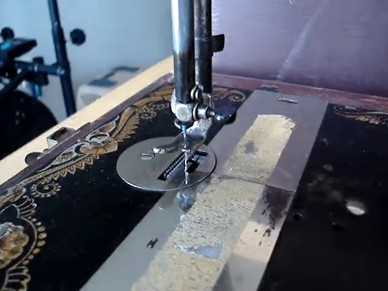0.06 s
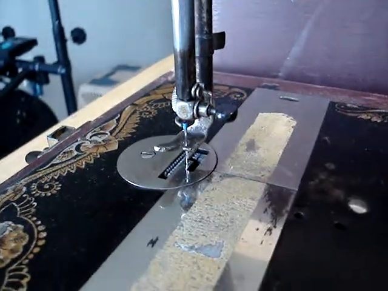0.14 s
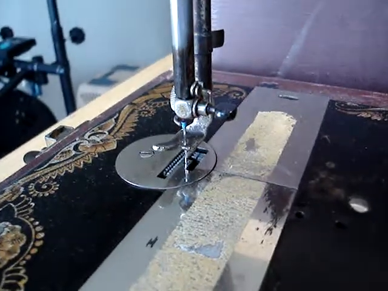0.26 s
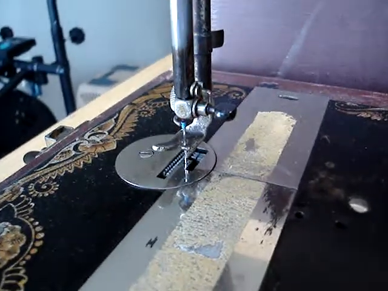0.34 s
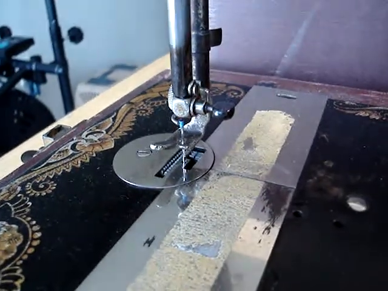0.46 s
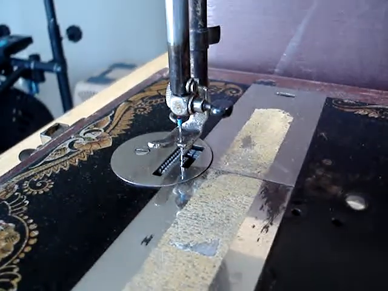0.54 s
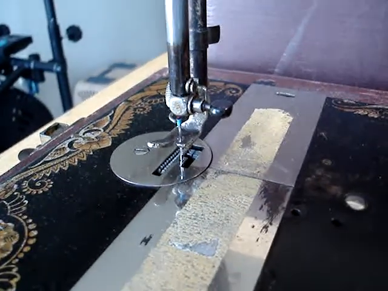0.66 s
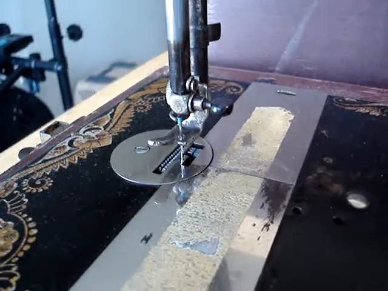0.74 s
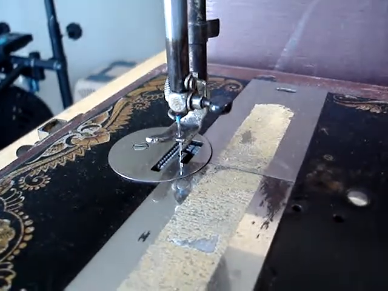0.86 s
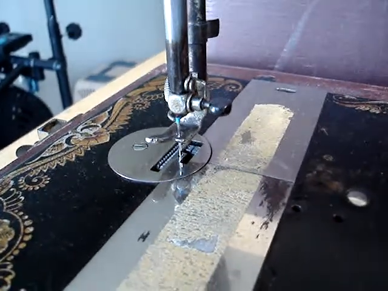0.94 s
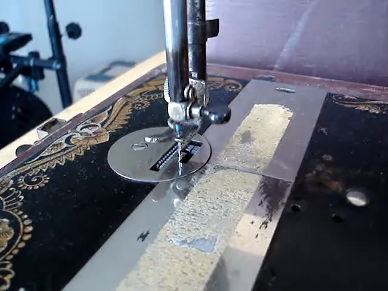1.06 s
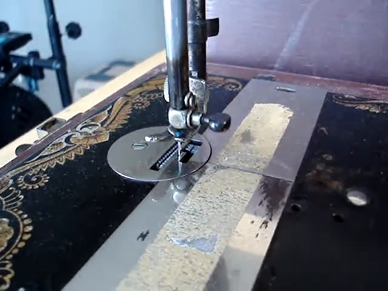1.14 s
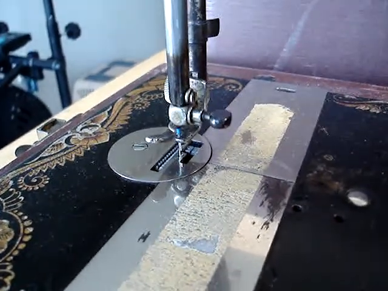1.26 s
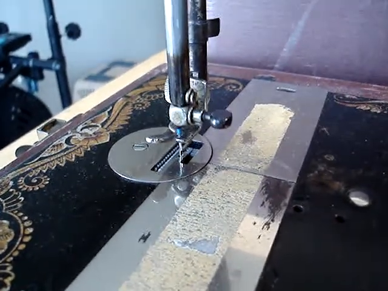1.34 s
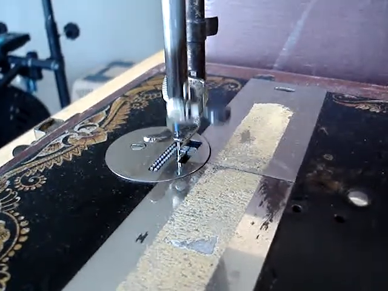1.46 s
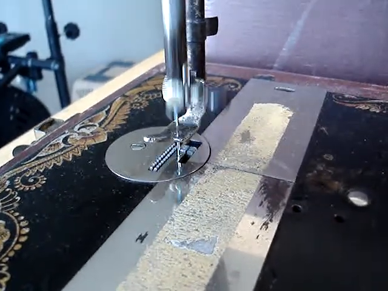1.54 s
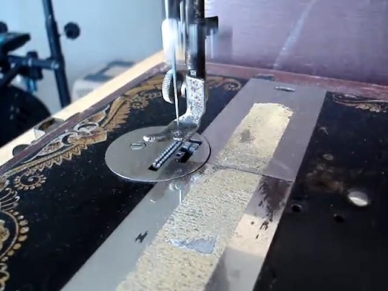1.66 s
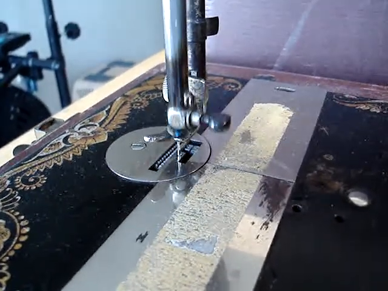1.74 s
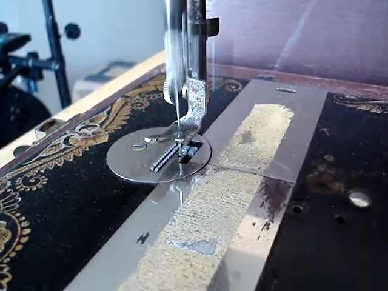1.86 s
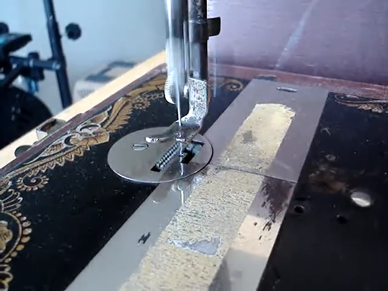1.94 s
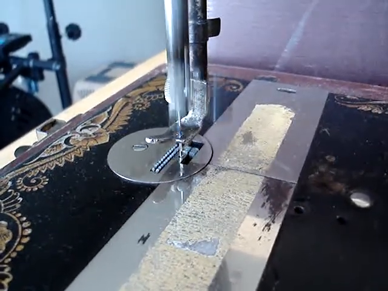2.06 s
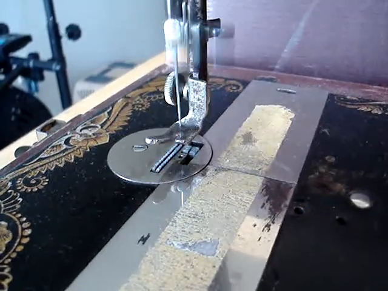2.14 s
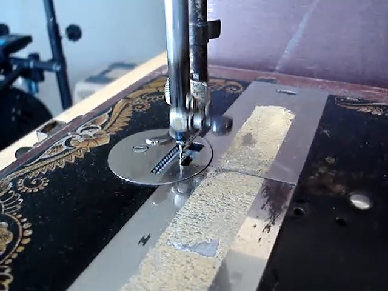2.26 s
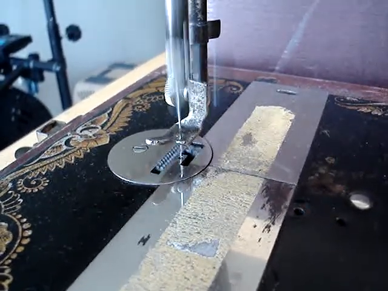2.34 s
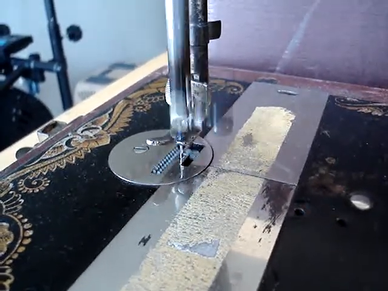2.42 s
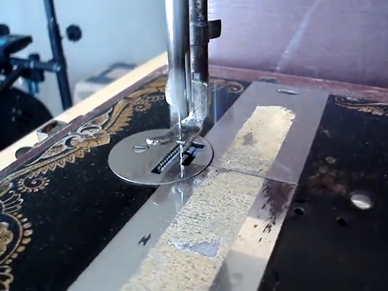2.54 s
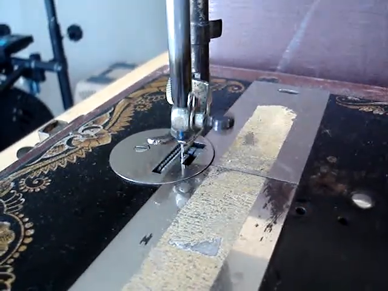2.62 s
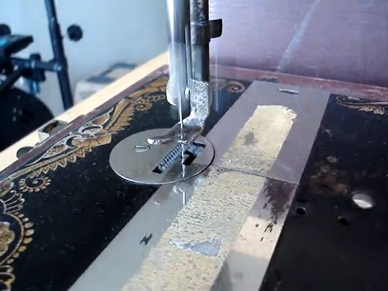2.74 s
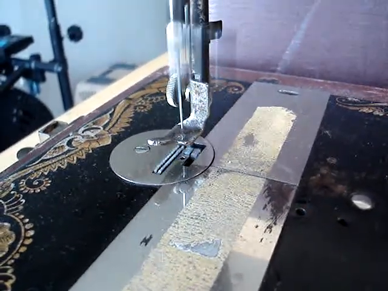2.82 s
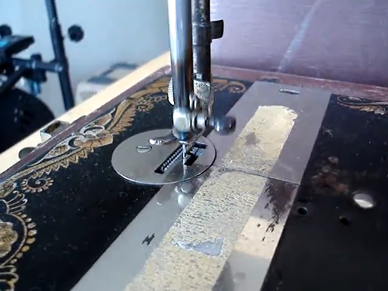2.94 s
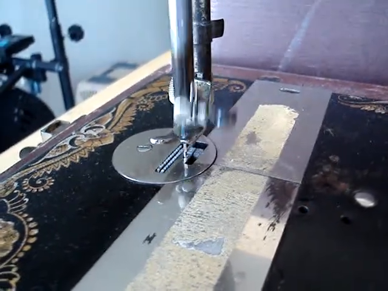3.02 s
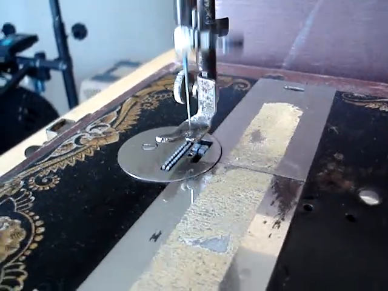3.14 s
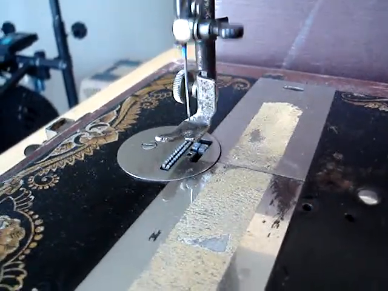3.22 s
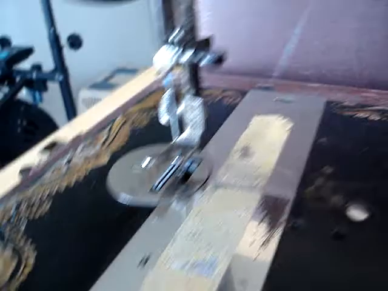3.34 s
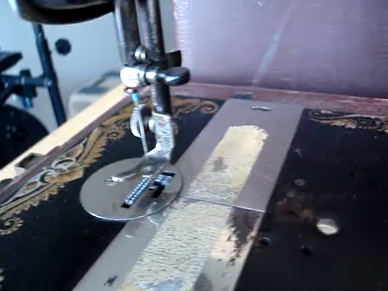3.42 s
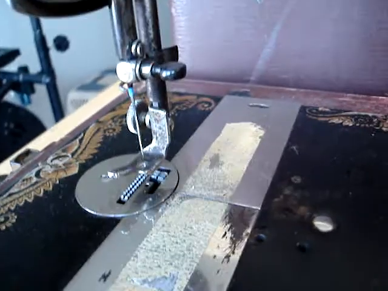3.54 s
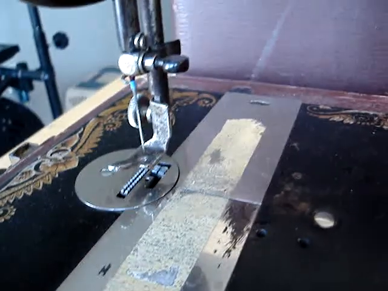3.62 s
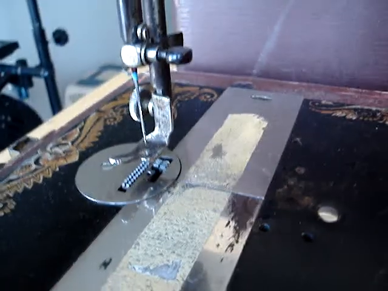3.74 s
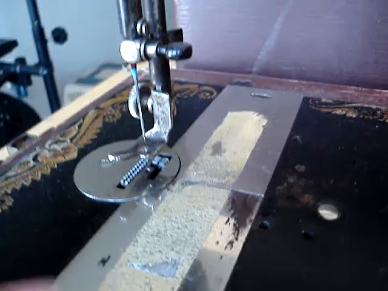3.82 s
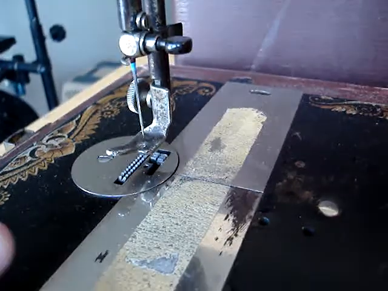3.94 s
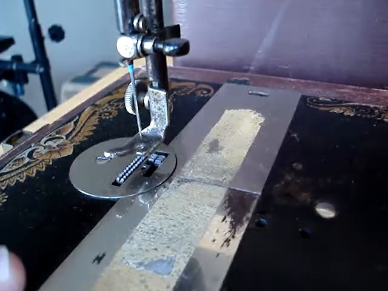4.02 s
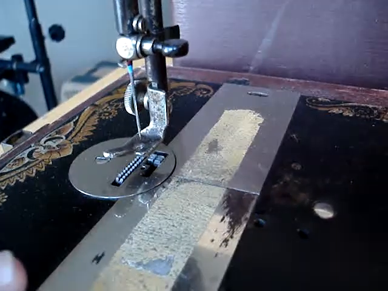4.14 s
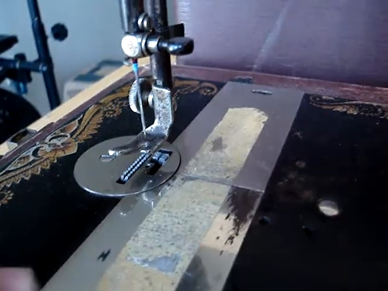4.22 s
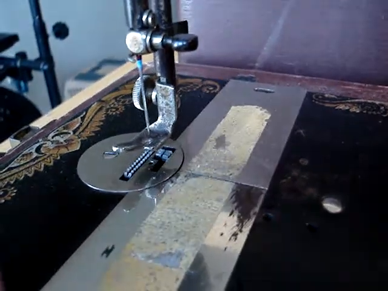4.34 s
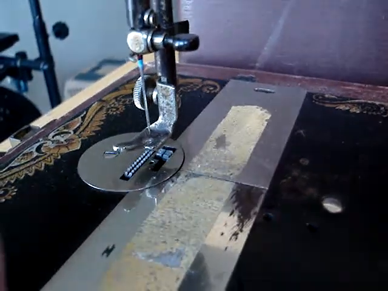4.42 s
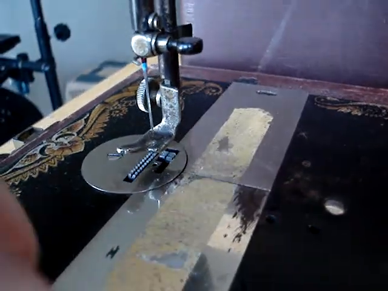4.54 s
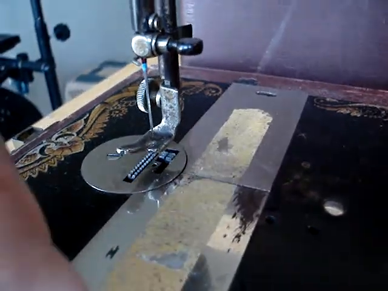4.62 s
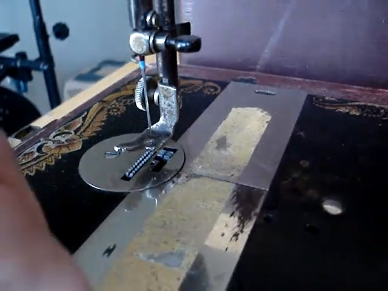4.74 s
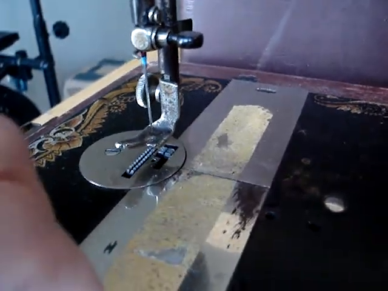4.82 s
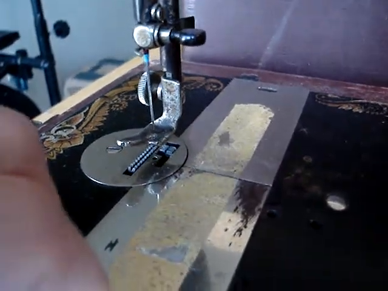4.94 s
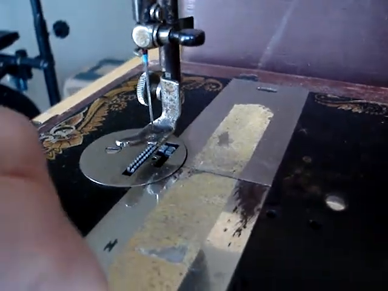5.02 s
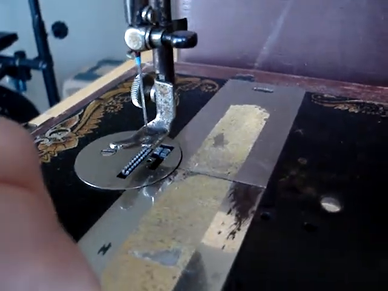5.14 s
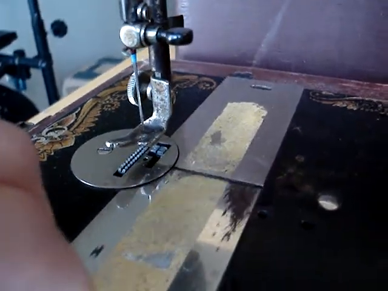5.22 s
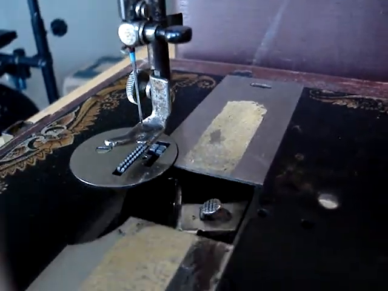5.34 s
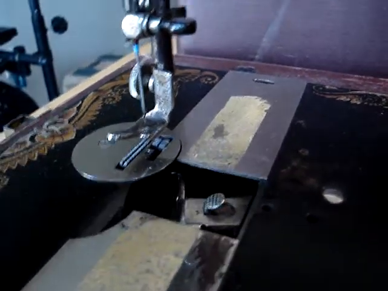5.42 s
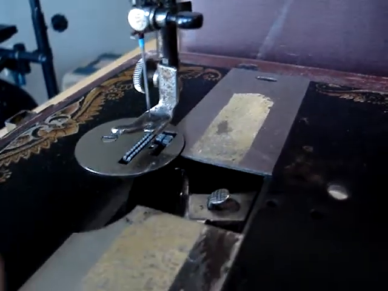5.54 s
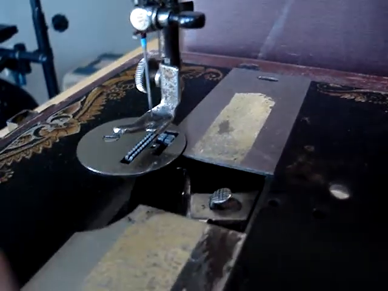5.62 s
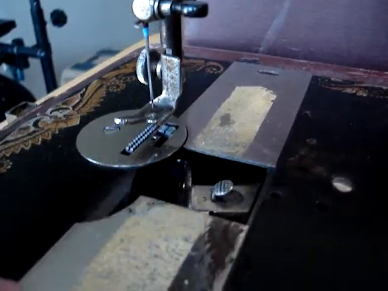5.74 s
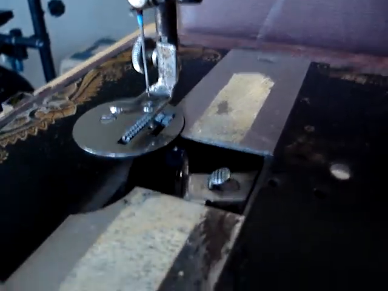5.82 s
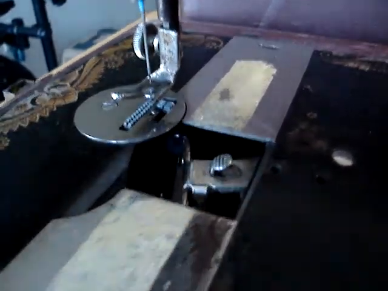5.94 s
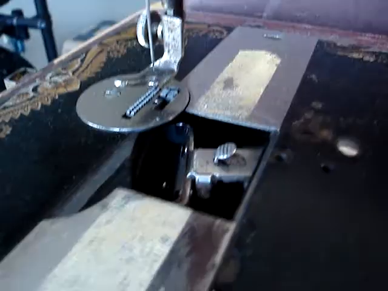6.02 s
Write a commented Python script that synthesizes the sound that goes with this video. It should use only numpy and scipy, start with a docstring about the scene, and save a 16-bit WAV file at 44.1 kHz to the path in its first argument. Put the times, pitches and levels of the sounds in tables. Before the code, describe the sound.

Close up, a motor strains and buzzes, linkage rattles rapidly with bearing squeals, coasts to a halt, then a cover plate clicks and slides.

```python
"""An old cast-iron sewing machine, close to a small microphone in a quiet room: knocks and rubbing of its
linkage excite the modes of the iron frame, and bearings squeal by stick-slip once a turn.
The motor hums and buzzes against the load, then the linkage knocks, runs and coasts to rest.
Later a finger ticks a small fitting and scrapes the cover plate open, both as struck resonators.
Behind them lies a distant fan-like murmur, noise in flickering bands with thin wavering tones."""
import sys
import numpy as np
from scipy import signal
from scipy.fft import rfft, irfft
from scipy.io import wavfile
from scipy.ndimage import uniform_filter1d

SR = 44100
rng = np.random.default_rng(int(sys.argv[2]) if len(sys.argv) > 2 else 0)


def invert_db(x):
    """Field ratio 10**(x/20) for x, a level in decibels (scalar or array-like)."""
    u = np.asarray(x, float) / 20
    return 10 ** u


def log_audio(samples):
    """Write samples as a 16-bit WAV file to the path given in sys.argv[1]."""
    # one column per channel
    frames = np.atleast_2d(samples).T
    # limit to full scale, then quantise
    limited = np.clip(frames, -1, 1)
    pcm = np.round(limited * 32767).astype(np.int16)
    wavfile.write(sys.argv[1], SR, pcm)


N = 268128
T = np.arange(N) / SR


def level(x):
    """Normalisation: scale to unit root mean square."""
    return x / np.sqrt(np.mean(x ** 2))


def curve(rows, column=1, off_db=-120):
    """Envelope: gain interpolated linearly in decibels, off outside the rows."""
    rows = np.array(rows)
    return invert_db(np.interp(T, rows[:, 0], rows[:, column], off_db, off_db))


def swell(start, attack, hold, release, db):
    """Exponential growth and decay: gain rises, holds and falls in straight decibel lines."""
    fade_db = -41  # where attacks start and releases end
    top = start + attack
    end = top + hold
    return curve([(start, db + fade_db), (top, db), (end, db), (end + release, db + fade_db)])


def ring(x, modes):
    """Modal superposition: sum of two-pole resonances with alternating sign."""
    out = 0
    for k, (hz, width, db) in enumerate(modes):
        b, a = signal.iirpeak(hz, hz / width, fs=SR)
        out = out + (-1) ** k * invert_db(db) * signal.lfilter(b, a, x)
    return out


def walk(rate):
    """Band-limited fluctuation: random levels held 1 / rate s and slewed; spread near 1."""
    k = int(SR / rate)
    held = np.repeat(rng.standard_normal(N // k + 1), k)
    return 1.182 * uniform_filter1d(held, k)[:N]


def grit(per_s, spread_db, smooth):
    """Shot noise: dense tiny impacts of uneven size over a smooth hiss."""
    struck_now = rng.random(N) < per_s / SR
    sizes = invert_db(spread_db * rng.uniform(-0.76, 1, N))
    hits = struck_now * sizes * np.sign(rng.standard_normal(N))
    return level(level(hits) + smooth * rng.standard_normal(N))


def squeak(hz, waver_hz):
    """Stick-slip oscillation: a tone that wavers in pitch and sputters in level."""
    phase = 2 * np.pi * np.cumsum(hz + waver_hz * walk(400)) / SR
    return np.sqrt(2) * np.sin(phase) * invert_db(3 * walk(120))


# bright, middle and deep groups of modes: lowest f/Hz, highest f/Hz
GROUP_EDGES = [(1800, 11000), (700, 1800), (0, 700)]


def struck(modes, rows, rubs, chatter_s, focus, wander_db, lengths):
    """Modal excitation: blows (a crack and a dying chatter) and rubbing drive one body's mode groups."""
    crack = 3.2  # first contact over the chatter
    out, tail = 0, np.arange(2048) / SR
    chatter = rng.standard_normal((len(rows), 2048))
    for k, ((lo, hi), rub) in enumerate(zip(GROUP_EDGES, rubs)):
        part = [m for m in modes if lo <= m[0] < hi]
        blows = np.zeros(N)
        for row, noise, length in zip(rows, chatter, lengths):
            rise = 1 - np.exp(-tail / (0.0005 * length ** 2))
            push = np.exp(-tail / (chatter_s[k] * length)) * rise
            if k == 0:
                # each contact point favours the modes near its own clink
                noise = level(noise + focus * ring(noise, [(row[4], 800, 0)]))
            noise = np.r_[noise[:8], crack / push[8] / length ** 2, noise[9:]]
            # the chatter keeps the energy of its envelope
            blow = noise * push * np.sqrt(np.sum(push ** 2) / np.sum((noise * push) ** 2))
            i = int(row[0] * SR)
            blows[i:i + 2048] += (invert_db(row[k + 1]) * blow)[:N - i]
        # the contact lasts too long to push the highest modes
        blows = signal.sosfilt(signal.butter(2, 6000, fs=SR, output="sos"), blows)
        unit = np.sqrt(np.sum(ring(signal.unit_impulse(8192), part) ** 2))
        for j, mode in enumerate(part):
            # the rubbing point wanders, so each mode swells and fades alone, the high ones most
            wander = invert_db(wander_db * (1 + mode[0] / 9000) * walk(45))
            out = out + (-1) ** j * ring(blows + rub * wander, [mode]) / unit
    return out


# colouring of the hiss: f/Hz, width/Hz, relative level/dB
HISS_MODES = [(5940, 12400, 0), (7900, 55, 11.5), (8970, 56, 8.5)]


def microphone_hiss():
    """Coloured self-noise: steady white noise shaped by resonances."""
    return invert_db(-62.5) * level(ring(rng.standard_normal(N), HISS_MODES))


# spectrum of the murmur: f/Hz, relative level per Hz/dB
ROOM_COLOUR = [(12, -55), (20, -15.5), (112, -20.5), (141, -9), (272, -3), (318, -4), (391, -5),
               (495, -2.5), (594, -7.5), (642, -8.5), (695, -9), (1000, -12), (1480, -20), (7660, -37.5),
               (10200, -63), (13300, -64), (22000, -120)]
# thin tones: f/Hz, wander/Hz, level over the murmur/dB
ROOM_LINES = [(273.8, 12.1, -11), (388.6, 8.46, -11), (643.6, 1.94, -7.5), (990, 3.62, -18.5)]


def room():
    """Narrow-band noise: half-octave bands flicker alone, with a few thin wavering tones."""
    hz = np.fft.rfftfreq(N, 1 / SR) + 1
    colour = np.array(ROOM_COLOUR)
    gain = invert_db(np.interp(np.log(hz), np.log(colour[:, 0]), colour[:, 1]))
    shape = rfft(rng.standard_normal(N)) * gain
    place = 2 * np.log2(hz / 20)
    murmur, tones = 0, 0
    for k in range(19):
        band = np.clip(1 - abs(place - k), 0, 1)
        murmur = murmur + irfft(shape * band, N) * invert_db(2.0 * walk(6.5))
    for f, wander_hz, db in ROOM_LINES:
        phase = 2 * np.pi * np.cumsum(f + wander_hz * walk(12)) / SR
        tones = tones + invert_db(db + 0.5 * walk(1.9)) * np.sin(phase)
    # the murmur sinks during the run and creeps back
    from_s, sunk_s, creep_s = 1.9, 3.12, 1.13
    sink = np.interp(T, [from_s, sunk_s], [0, 1]) * np.exp(-np.maximum(T - sunk_s, 0) / creep_s)
    return (level(murmur) + np.sqrt(2) * tones) * invert_db(-41.5 - 10.5 * sink)


# jolts of the table: t/s, level before decay/dB
SHAKES = [(1.801, -20), (1.879, -13.5), (1.998, -25), (2.05, -18), (2.319, -38)]


def shakes():
    """Damped oscillation: each jolt of the table swings the microphone for about one slow cycle."""
    out, t = np.zeros(N), np.arange(4096) / SR
    swing = np.sin(2 * np.pi * 32 * t) * np.exp(-t / 0.0065)
    for s, db in SHAKES:
        i = int(s * SR)
        out[i:i + 4096] += invert_db(db) * swing
    return out


# fingernail on a small fitting: t/s, bright, middle and deep drive level/dB, centre of the clink f/Hz
TICKS = [(4.3138, -41, -56, -57, 2370), (4.5378, -30.5, -27.5, -39, 6310), (4.9118, -61, -62, -50, 2090)]
# modes of the fitting: f/Hz, width/Hz, relative level/dB
FITTING = [(497, 270, 0), (926, 70, -21), (1738, 40, -2), (1960, 38, 3.5), (2770, 610, -7),
           (4030, 750, -5.5), (6260, 230, -3)]


def fitting():
    """Impulsive excitation: a fingernail ticks a small fitting and its modes ring."""
    return struck(FITTING, TICKS, np.zeros((3, N)), [.002, .0055, .004], 1.0, 0, np.ones(len(TICKS)))


# finger rubbing the plate in jerks: start t/s, attack t/s, hold t/s, release t/s, drive level/dB
SLIDES = [(5.22, 0.085, 0.11, 0.14, -50), (5.315, 0.028, 0.016, 0.025, -33),
          (5.362, 0.007, 0.022, 0.03, -32), (5.89, 0.033, 0.1, 0.14, -52)]
# rubbing of the bright, middle and deep modes over the slides: level/dB
SLIDE_GROUPS = [-0.5, -1, -2]
# plate breaking free and catching: t/s, bright, middle and deep drive level/dB, centre of the clink f/Hz
SNAPS = [(5.3448, -26, -24, -33, 2940), (5.3683, -18, -18.5, -28, 2770)]
# modes of the plate: f/Hz, width/Hz, relative level/dB
PLATE = [(414, 240, -3), (970, 130, 4.5), (1170, 52, 5.5), (1350, 110, -0.5), (1950, 1200, -5),
         (2660, 170, 5), (2900, 260, 8), (3900, 2400, -2.5), (5340, 740, 1), (7640, 1000, -6.5),
         (8860, 900, -6)]


def plate():
    """Friction excitation: a thin cover plate is scraped along its groove, breaks free and catches."""
    finger = sum(swell(*row) for row in SLIDES)
    rubs = [grit(1000, 8.2, 0.25) * invert_db(db + 2.1 * walk(150)) * finger for db in SLIDE_GROUPS]
    return struck(PLATE, SNAPS, rubs, [.0021, .0034, .004], 0.98, 1.24, np.ones(len(SNAPS)))


# slow creeping squeaks: start t/s, attack t/s, hold t/s, release t/s, level/dB, f/Hz
SQUEAKS = [(.88, .08, .05, .1, -52, 1400), (.99, .1, .09, .09, -41.5, 1485),
           (1.22, .08, .005, .05, -41, 1480), (5.935, .02, .048, .16, -54, 2790)]


def creeping_squeaks():
    """Stick-slip friction: parts squeak as they creep."""
    return sum(squeak(row[5], 70) * swell(*row[:5]) for row in SQUEAKS)


# hum of the motor current: t/s, level/dB
HUM = [(0.2, -59), (0.46, -56), (0.63, -43.5), (0.83, -44.5), (1.11, -34.5), (1.41, -36.5), (1.74, -32.5),
       (2.03, -39), (2.16, -48), (2.9, -56)]
# rattle of the stalled motor: start t/s, attack t/s, hold t/s, release t/s, level/dB
BUZZES = [(0.468, 0.1, 0.32, 0.18, -38.5)]
# modes of the rattling housing: f/Hz, width/Hz, relative level/dB
BUZZ_MODES = [(1189, 24, 2.5), (1990, 180, -9.5), (2445, 49, 3.5), (2780, 230, 5), (3050, 350, 3.5),
              (3870, 230, -3.5), (4250, 290, -7.5), (5300, 800, -12), (7500, 1000, -11.5),
              (9000, 970, -11.5)]


def motor():
    """Magnetic force at twice the mains frequency: it hums; stalled, a loose part taps once per cycle."""
    hum_hz = 119.9
    hum = np.sqrt(2) * np.sin(2 * np.pi * hum_hz * T) * curve(HUM)
    count, cycle = int(N / SR * hum_hz), int(SR / hum_hz)
    chance = rng.standard_normal((count, 2))
    # the tap drifts slowly within the cycle
    drift = .00017 * walk(12)[::cycle][:count]
    at = np.arange(count) / hum_hz + .0016 + drift + .00002 * chance[:, 0]
    taps = np.zeros(N)
    taps[np.clip((at * SR).astype(int), 0, N - 1)] = invert_db(1.0 * chance[:, 1])
    # the tap rebounds once
    bounce_s, bounce_db = 0.002046, 3
    late = at + bounce_s + .00012 * walk(15)[::cycle][:count]
    taps[np.clip((late * SR).astype(int), 0, N - 1)] = invert_db(bounce_db + 1.6 * chance[:, 0])
    # a soft contact
    taps = signal.sosfilt(signal.butter(1, 3500, fs=SR, output="sos"), taps)
    fizz = .3 * rng.standard_normal(N)
    buzz = level(ring(level(taps) + fizz, BUZZ_MODES))
    return hum + sum(swell(*row) for row in BUZZES) * buzz


# the turning shaft from start to run-down, one row a stitch: feed knock t/s, needle-bar clack t/s
STITCHES = [(1.177, 1.505), (1.796, 1.891), (2.042, 2.123), (2.243, 2.319), (2.434, 2.507), (2.617, 2.689),
            (2.797, 2.868), (2.984, 3.09)]


def shaft_turns():
    """Rotation kinematics: shaft angle in turns, with two slow turns before and two after the stitches."""
    feed_place = .61  # turns after the clack
    start_rate, coast_rate = 1.2, 2.1  # turns per s
    s = np.ravel(STITCHES)
    turns = (np.arange(len(STITCHES))[:, None] + [feed_place, 1]).ravel()
    times = np.r_[s[0] - 2 / start_rate, s, s[-1] + 2 / coast_rate]
    return np.interp(T, times, np.r_[turns[0] - 2, turns, turns[-1] + 2])


# squealing bearings: f/Hz, pitch fall per half length/Hz, place/turns, half length/turns,
# level over the common curve/dB
SQUEALS = [(4230, 100, .84, .17, 0), (3140, 30, .88, .12, 0), (3500, -50, .1, .12, -3)]
# common curve of the squeals: t/s, level/dB
SQUEAL_LEVEL = [(1.3, -60), (1.45, -47), (1.65, -43), (1.9, -33), (2.9, -35), (3.05, -42), (3.2, -44),
                (3.27, -50), (3.32, -65)]


def bearing_squeals(angle):
    """Stick-slip in rotation: each bearing squeals over one part of every turn."""
    out = 0
    for hz, fall_hz, place, length, db in SQUEALS:
        away = ((angle - place + .5) % 1 - .5) / length
        tone = squeak(hz - fall_hz * away, 35)
        out = out + tone * np.exp(-away ** 4) * invert_db(db + 2.5 * walk(50)) * curve(SQUEAL_LEVEL)
    return out


# shafts and cams rubbing: t/s, middle drive level/dB, bright level over the middle/dB
RUN = [(0.9, -61.5, -5.5), (1.16, -40.5, -20.5), (1.3, -48, -24), (1.55, -35.5, -6), (1.7, -35.5, 0),
       (1.95, -26.5, -3), (2.2, -29, -0.5), (2.8, -30.5, -0.5), (3.07, -37.5, 2), (3.2, -38.5, -5.5),
       (3.3, -57, -3), (3.42, -64, -12)]
# cams, feed and needle bar: t/s, bright, middle and deep drive level/dB, centre of the clink f/Hz
KNOCKS = [(1.1771, -18, -27.5, -33, 2300), (1.272, -23, -27, -27, 2650), (1.302, -36.5, -29, -41, 3100),
          (1.3872, -29.5, -29.5, -29.5, 2620), (1.4387, -31, -57, -37, 4250),
          (1.453, -30.5, -48, -33, 4290), (1.5046, -21.5, -26.5, -26.5, 3140),
          (1.5326, -29, -25, -31.5, 4300), (1.6918, -28.5, -32, -29.5, 4400),
          (1.728, -26.5, -30.5, -22.5, 2450), (1.7957, -14.5, -15, -29, 4070),
          (1.8217, -16, -17, -14.5, 3530), (1.8521, -18, -23, -20, 4300), (1.8915, -14.5, -12, -20, 4230),
          (1.903, -16, -23, -23, 4230), (1.9584, -29, -35, -18, 3500), (2.0057, -17, -21, -34, 2530),
          (2.0422, -13, -22.5, -43, 2620), (2.0691, -15, -21.5, -17.5, 2520), (2.0926, -17, -19, -27, 2640),
          (2.1235, -13, -12.5, -24.5, 3120), (2.1863, -18, -24, -28.5, 3140),
          (2.2158, -21.5, -16, -34, 4264), (2.2432, -23, -22, -44, 2690), (2.2696, -15, -26, -18.5, 4900),
          (2.2911, -14, -24, -32, 2680), (2.3195, -14, -17.5, -33, 4400), (2.3864, -19, -23.5, -33, 3110),
          (2.4068, -18.5, -28, -38, 2500), (2.4338, -16, -19, -49, 3560), (2.4592, -18.5, -25, -23, 3230),
          (2.4837, -14, -22, -39.5, 3870), (2.5076, -16.5, -26, -40, 3140), (2.564, -22.5, -25, -35, 3475),
          (2.6169, -14, -18, -37, 2610), (2.6413, -20, -19, -30, 3530), (2.6623, -31, -24, -33, 2630),
          (2.6892, -13, -29, -33, 4240), (2.7511, -24, -24.5, -37, 3220), (2.7965, -14.5, -26, -42, 2470),
          (2.8458, -18.5, -24, -32, 4210), (2.8678, -14, -19.5, -31, 3230), (2.9172, -25.5, -27, -53, 2450),
          (2.9566, -23, -22, -39, 3100), (2.9845, -13.5, -25.5, -46, 2430),
          (3.0224, -16.5, -18.5, -24.5, 4210), (3.053, -28, -25, -33, 2500),
          (3.0915, -25, -23.5, -29.5, 3150), (3.2888, -44, -48, -63, 2620), (3.3102, -33.5, -39, -64, 2380)]
# modes of the iron frame and table: f/Hz, width/Hz, relative level/dB
FRAME = [(183, 28.5, -4.5), (273.7, 28, -6.5), (340, 22, -0.5), (443.5, 27.6, -3), (542, 237, -11),
         (793, 12.6, 5.5), (1001, 26, 2.5), (1057, 19, 5.5), (1186, 36, -8.5), (1322, 36, 9.5),
         (1497, 210, -5.5), (1643, 10, 5), (1260, 460, 2.5), (2034, 57, 1.5), (2396, 86, 2.5),
         (2650, 223, 4), (3170, 68, -7.5), (3665, 670, 5.5), (4230, 305, -3), (4985, 62, -2.5),
         (3453, 1600, 3.5), (5430, 210, -3), (5760, 590, -17.5), (7350, 750, -9), (8315, 190, -6.5)]


def linkage(angle):
    """Impact and friction excitation: knocks and gritty rubbing ring the iron frame, easing once a turn."""
    turn = (angle - .237) % 1  # turns since the quiet place
    ease = invert_db(-6.5 * np.exp(-np.minimum(turn, 1 - turn) ** 2 / 0.0014))
    run = np.array(RUN)
    bright_db = np.interp(T, run[:, 0], run[:, 2])
    deep_db = -6 - 0.12 * bright_db  # duller rubbing is also deeper
    effort = curve(RUN) * invert_db(np.array([bright_db, 0 * T, deep_db]))
    rubs = [grit(2500, 8.0, .7) * invert_db(2.0 * walk(140)) * ease * e for e in effort]
    # feed knocks are sharp, the slacker knocks longer
    gap_s = abs(np.array(KNOCKS)[:, :1] - np.array(STITCHES)[:, 0]).min(axis=1)
    lengths = np.where(gap_s < .004, .65, 1.15)
    return struck(FRAME, KNOCKS, rubs, [.0044, .0075, .0115], 1.28, 2.12, lengths)


def machine():
    """Common drive: one shaft angle times both the linkage rubbing and the bearing squeals."""
    angle = shaft_turns()
    return linkage(angle) + bearing_squeals(angle)


def scene():
    """Superposition and reverberation: all sources, with a short wall echo of the near ones."""
    near = motor() + machine() + creeping_squeaks() + plate() + fitting()
    t = np.arange(SR // 4) / SR
    # diffuse decay of 60 dB in 0.31 s, after a 4 ms gap
    walls = rng.standard_normal(len(t)) * np.exp(-np.log(1000) * t / 0.31) * (t > .004)
    echo = signal.fftconvolve(near, walls / np.sqrt(np.sum(walls ** 2)))[:N]
    return (near + invert_db(-16.5) * echo + shakes() + room())[None]


def top_cut(x):
    """Nothing passes above the cut-off."""
    return signal.sosfilt(signal.butter(12, 10350, fs=SR, output="sos"), x)


def record(dry):
    """Saturation and low-pass filtering: hiss is added, peaks are rounded, the top rolls off and is cut."""
    rounded = np.tanh(1.3 * (dry + microphone_hiss())) / 1.299
    soft = signal.sosfilt(signal.butter(4, 9300, fs=SR, output="sos"), rounded)
    dull = signal.sosfilt(signal.ellip(8, .2, 60, 10150, fs=SR, output="sos"), soft)
    return top_cut(dull)


dry = scene()
out = record(dry)
log_audio(out)
```